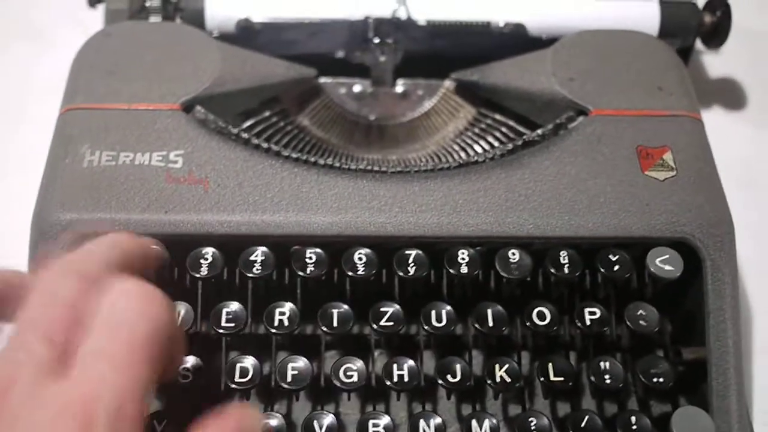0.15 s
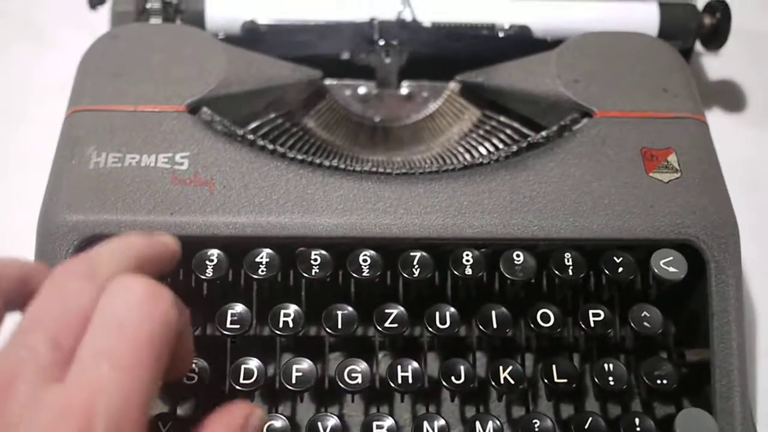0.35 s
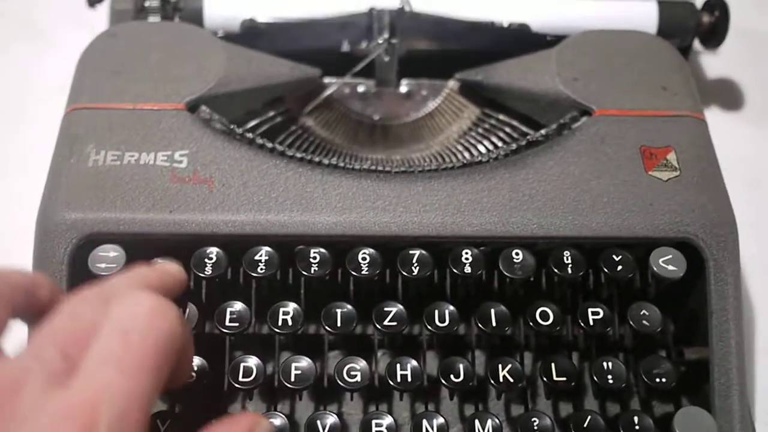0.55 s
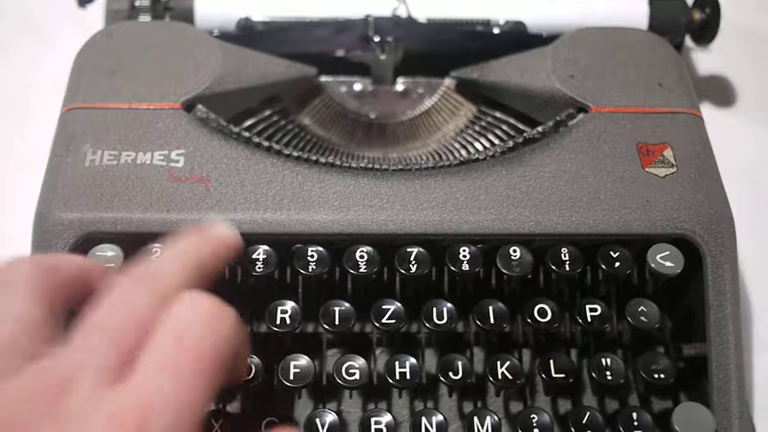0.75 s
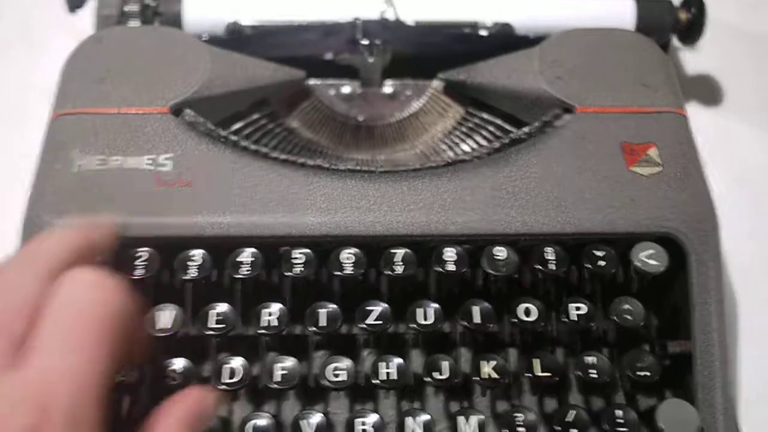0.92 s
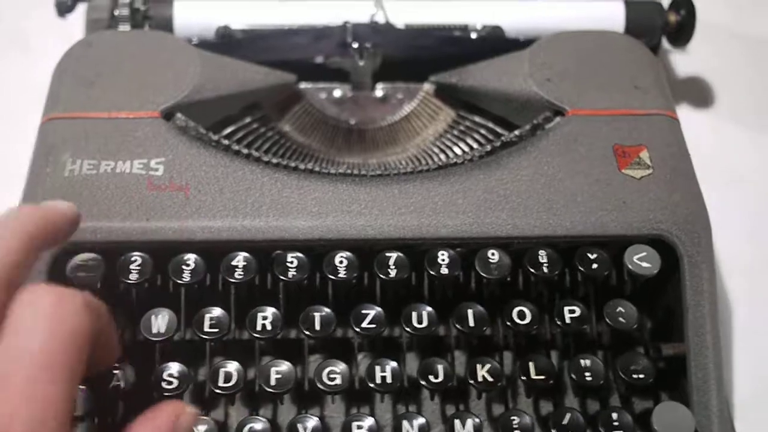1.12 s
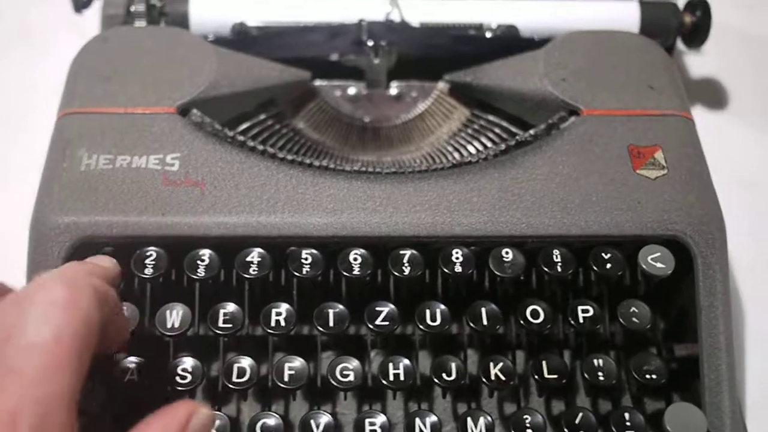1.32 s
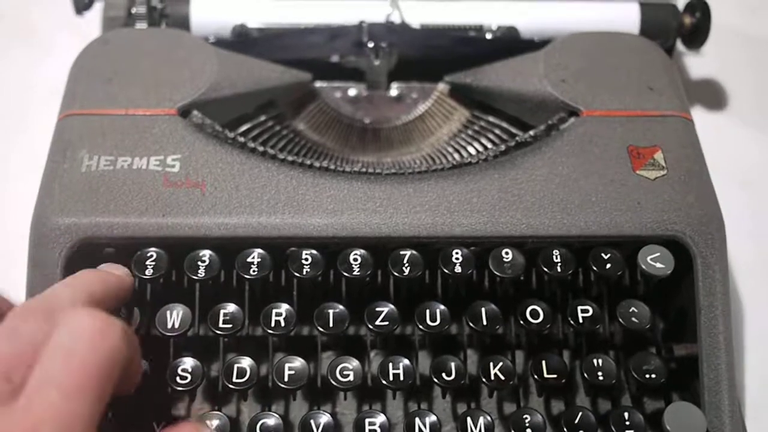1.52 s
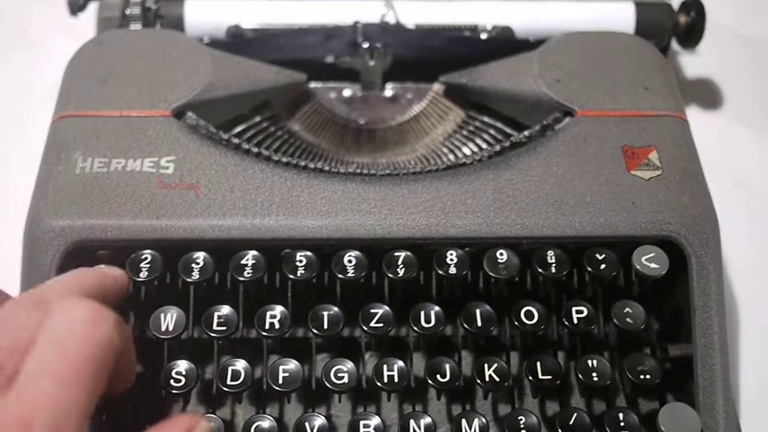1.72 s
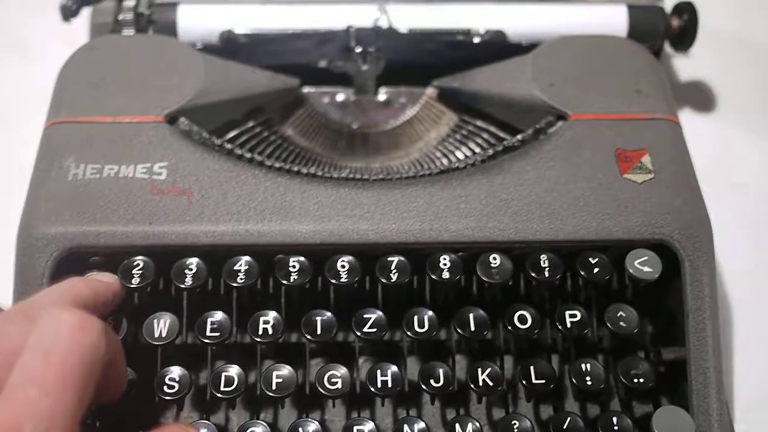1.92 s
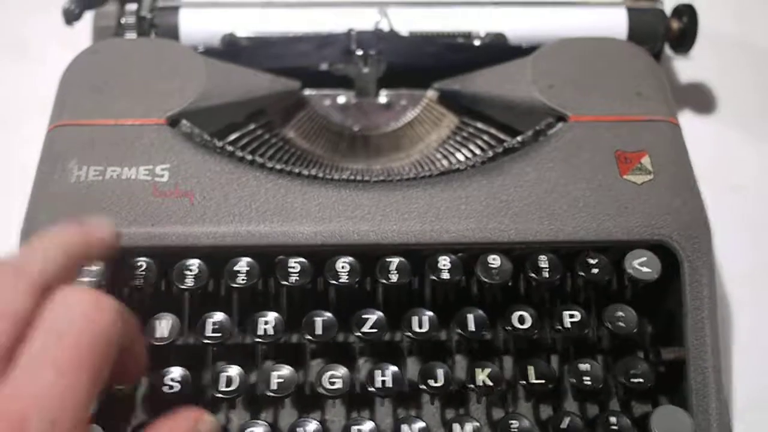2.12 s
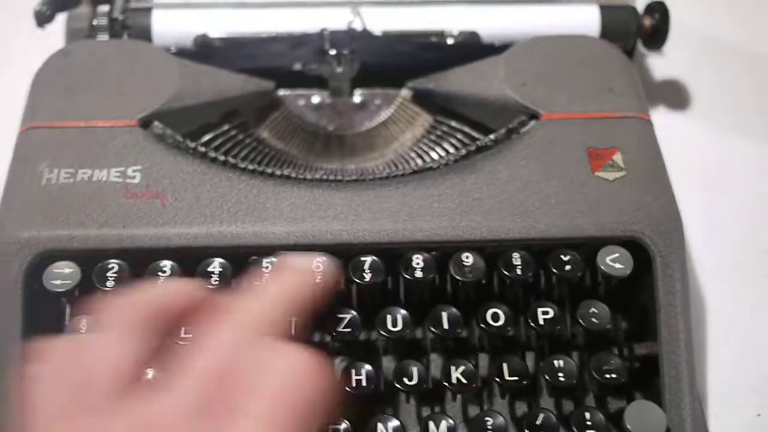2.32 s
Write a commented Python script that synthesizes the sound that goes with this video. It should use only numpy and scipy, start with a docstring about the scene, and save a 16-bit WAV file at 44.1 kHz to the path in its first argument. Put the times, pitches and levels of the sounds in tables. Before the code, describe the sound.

A manual typewriter: two sharp key strikes, then repeated metallic clacks of its shift mechanism indoors

```python
"""Quiet room: a finger types two characters on a small manual typewriter, then works the shift key.
Each contact of metal parts is a short noise chatter that rings the part it hits; springs and levers
rattle as dense random ticks. The table thumps in low sines, noise tails answer as the room, and
shaped noise is the hush. A narrow-band microphone close by overloads on the hardest strike."""
import sys
import numpy as np
from scipy import signal
from scipy.fft import rfft, irfft
from scipy.io import wavfile

SR = 44100
rng = np.random.default_rng(int(sys.argv[2]) if len(sys.argv) > 2 else 0)


def transcribe(signal):
    """Save signal, clipped to [-1, 1], as a 16-bit WAV file at the path in sys.argv[1]."""
    frames = np.atleast_2d(signal).T
    limited = np.clip(frames, -1, 1)
    pcm = np.round(limited * 32767).astype(np.int16)
    wavfile.write(sys.argv[1], SR, pcm)


N = 103635

# modes of the machine frame: mode_hz, level_db, t60_s
FRAME_MODES = [(976, -11, 0.11), (1131, -6, 0.038), (1488, -1, 0.12), (2490, -11, .04), (3930, -20, .04),
               (5560, -17.5, .04)]
# modes of the carriage stop: mode_hz, level_db, t60_s
STOP_MODES = [(555, -9.5, .06), (957, -1, 0.11), (1060, -3, 0.15), (1395, -12, 0.3), (2360, -26.5, 0.082),
              (2600, -33, 0.19), (3220, -10.5, 0.093), (3380, -10, 0.098), (3580, -11, .09),
              (3780, -3.5, 0.12), (5830, -24, .06), (6800, -5, 0.038)]
# microphone response: freq_hz, gain_db
MIC_RESPONSE = [(60, -57), (250, -24), (450, -13), (620, -5.5), (900, 2.5), (2000, 0.5), (3000, 4),
                (6800, -5), (7500, -15), (8100, -34.5), (8900, -37)]


def amp(db):
    """Decibels to amplitude ratio."""
    return 10 ** (np.asarray(db) / 20)


def unit_rms(x):
    """Scale to an RMS of 1."""
    return x / np.sqrt(np.mean(x ** 2) + 1e-20)


def read(points, hz):
    """Interpolate (Hz, value) points along log frequency."""
    f, value = np.transpose(points)
    return np.interp(np.log(hz + 1), np.log(f + 1), value)


def add(mix, start_s, sound):
    """Add a sound into the mix in place, cut at the end."""
    part = mix[round(start_s * SR):][:len(sound)]
    part += sound[:len(part)]


def colour(x, points):
    """Causal minimum-phase filter from (Hz, dB) points."""
    log_gain = np.log(amp(read(points, abs(np.fft.fftfreq(4096, 1 / SR)))))
    taps = np.fft.ifft(np.exp(np.conj(signal.hilbert(log_gain)))).real[:2048]
    return signal.oaconvolve(x, taps)[:len(x)]


def lowpass(x, hz):
    """Steep linear-phase low-pass."""
    return signal.oaconvolve(x, signal.firwin(511, hz, window=("kaiser", 9), fs=SR), "same")


def hush():
    """Room tone and microphone hiss: steady noise with a shaped spectrum."""
    rms_db = -60
    # noise spectrum: freq_hz, relative_density_db
    spectrum = [(15, -42.5), (25, -19.5), (147, -4.5), (209, -6), (284, -6), (423, -13.5), (476, -15),
                (647, -20), (728, -16), (3070, -25), (7000, -33), (9100, -72), (15400, -120)]
    # top-end roll-off of the hiss: freq_hz, gain_db
    mic_roll = [(6900, 6), (7500, -8), (8000, -31.5), (8400, -43)]
    hz = np.fft.rfftfreq(N, 1 / SR)
    gain = amp(read(spectrum, hz) + read(mic_roll, hz))
    return amp(rms_db) * unit_rms(irfft(rfft(rng.standard_normal(N)) * gain, N))


def room(x):
    """Three noise tails, each band dying at its own speed, fed in turn."""
    level_db, build_up_s, turn_rad_per_s = -11, 0.0036, 8.995
    # reverberation time: freq_hz, t60_s
    decay = [(300, 1), (800, 0.76), (2000, 0.71), (5500, 0.53)]
    out, turn = np.zeros(N), np.arange(N) / SR * turn_rad_per_s
    for k in range(3):
        hz, t, z = signal.stft(rng.standard_normal(SR), SR, nperseg=256)
        dying = z * amp(-60 * t / read(decay, hz)[:, None])
        tail = signal.istft(dying, SR, nperseg=256)[1]
        tail = tail * np.minimum(np.arange(len(tail)) / SR / build_up_s, 1) ** 2
        share = np.sqrt(2 / 3) * np.cos(turn + k * np.pi / 3)  # squares sum to 1
        out += signal.fftconvolve(x * share, tail / np.linalg.norm(tail))[:N]
    return amp(level_db) * out


def thumps():
    """Low, soft resonances of the table, swelling and dying together."""
    rise_s, t60_s = 0.013, 0.43
    # table answering the carriage: start_s, level_db
    events = [(0.331, -46.5), (.585, -45.5), (1.202, -57)]
    # table modes: mode_hz
    table_hz = (88, 106.3, 145.5, 198.6)
    # level of each table mode: level_db
    table_db = (-4.5, -2.5, -12, -5.5)
    out, t = np.zeros(N), np.arange(SR // 2) / SR
    for start_s, level_db in events:
        ring = sum(amp(d) * np.sin(2 * np.pi * (hz * t + rng.random()))
                   for hz, d in zip(table_hz, table_db))
        add(out, start_s, amp(level_db - 60 * t / t60_s) * np.minimum(t / rise_s, 1) * ring)
    return out


def spring_rattles():
    """Springs and levers chattering in travel: dense uneven ticks that swell and fade."""
    ticks_per_s, mean_boost_db, n = 2300, 2.5, SR // 5
    # spring and lever travel: start_s, length_s, level_db (before swell and microphone), treble_db
    travels = [(0.222, 0.028, -33, -1), (0.264, 0.16, -38, -11), (.475, 0.045, -37, -10.5),
               (.515, 0.16, -35.5, -2), (1.028, 0.17, -63.5, -24), (1.202, 0.054, -34.5, -8),
               (1.359, 0.019, -40, -7), (1.393, 0.21, -45, -4.5), (1.486, 0.032, -37, -1),
               (1.579, 0.01, -37.5, -7.5), (1.691, 0.029, -41.5, 3.5), (1.787, 0.044, -42, -5.5),
               (1.794, 0.02, -37.5, -4), (1.885, 0.09, -43.5, -8), (1.908, 0.009, -35, 9),
               (2.069, 0.0051, -34.5, -4), (2.046, 0.024, -42.5, -4)]
    out = np.zeros(N)
    for start_s, length_s, level_db, treble_db in travels:
        heights = amp(mean_boost_db * rng.exponential(1, n))
        ticks = heights * (rng.random(n) < ticks_per_s / SR)
        ticks = ticks * rng.choice([-1., 1.], n)
        tone = [(1300, 7), (2200, -2), (3200, 0), (5200, treble_db)]
        ticks = unit_rms(colour(ticks, tone))
        progress = np.clip(np.arange(n) / SR / length_s, 0, 1)
        add(out, start_s, amp(level_db) * ticks * np.sin(np.pi * progress) ** .5)
    return colour(out, MIC_RESPONSE)


def mode_cluster(t, mode_hz, level_db, t60_s):
    """Six close decaying sines; long-ringing groups lie closer together."""
    half_width = .035 * min(1, .2 / t60_s)  # relative to mode_hz
    ring = 0
    for offset, phase_cycles in rng.random(size=(6, 2)):
        hz = mode_hz * (1 + half_width * (2 * offset - 1))
        ring = ring + np.sin(2 * np.pi * (hz * t + phase_cycles))
    return amp(level_db - 60 * t / t60_s) * ring


def contacts(rows, modes, ring_db, rise, fade_db, stop_db):
    """Each contact: a dying chatter of tiny impacts, heard as a crack and through groups of close modes.

    Row 0 goes straight to the microphone; row 1, the blow averaged over all directions, fills the room.
    rise is in chatter lengths, fade_db per chatter length; stop_db adds to that slope after one length.
    """
    roughness, clank_width, room_clank = 0.1, 0.18, 0.39  # spikiness, relative width, share of clank dB
    out, t = np.zeros((2, N)), np.arange(SR // 3) / SR
    for start_s, peak_db, chatter_s, low_db, treble_db, clank_hz, clank_db in rows:
        chatter = rng.standard_normal(1500)
        u = np.arange(len(chatter)) / SR / max(chatter_s, 1e-4)
        envelope = np.minimum(u / max(rise, .01), 1) * amp(fade_db * u + stop_db * np.maximum(u - 1, 0))
        chatter = chatter * abs(chatter) ** roughness * envelope
        body = sum(mode_cluster(t, *mode) for mode in modes) * amp(ring_db)
        body[0] = 1  # the direct crack
        tone = [(1300, low_db), (2100, 0), (3900, 0.02), (5200, treble_db)]
        body = colour(colour(body, tone), MIC_RESPONSE)
        clank = [(clank_hz * (1 - clank_width), 0), (clank_hz, clank_db), (clank_hz * (1 + clank_width), 0)]
        sound = colour(signal.fftconvolve(chatter, body), clank)
        sound = amp(peak_db) * sound / abs(sound).max()
        spread = colour(body, [(hz, room_clank * d) for hz, d in clank])
        spread = spread * np.linalg.norm(sound) / np.linalg.norm(spread)  # same energy
        add(out[0], start_s, sound)
        add(out[1], start_s + chatter_s / 2, spread)
    return out


def shift_ticks():
    """Light ticks of the shift ringing the carriage stop."""
    # start_s, peak_db, chatter_s, low_db, treble_db, clank_hz, clank_db
    ticks = [(1.466, -26.5, 0.0045, -17, 8, 3300, 2.65), (1.670, -31, 0.0084, 0, 6, 3340, 5),
             (1.764, -38, 0.009, 7, 4.5, 3100, 2), (1.880, -26.5, 0.0027, 5.5, 8, 3330, 6.6),
             (2.048, -45, 0.0022, 1, 14, 1210, 1.7)]
    return contacts(ticks, STOP_MODES, ring_db=-43.5, rise=0.07, fade_db=-6.5, stop_db=1.5)


def shift_drops():
    """Shift drops ringing the carriage stop."""
    # start_s, peak_db, chatter_s, low_db, treble_db, clank_hz, clank_db
    drops = [(1.214, -13, 0.0034, 1.5, 3, 3280, 15.3), (1.498, -20.5, 0.0023, -0.5, -14, 4600, 1.7),
             (1.5005, -16.5, 0.0044, 0, 2.5, 3000, 6.7), (1.922, -13.5, 0.0044, -1, -1.5, 3230, 10.5)]
    return contacts(drops, STOP_MODES, ring_db=-46.5, rise=.45, fade_db=-9, stop_db=2.5)


def shift_clunks():
    """Shift clunks ringing the carriage."""
    # start_s, peak_db, chatter_s, low_db, treble_db, clank_hz, clank_db
    clunks = [(1.186, -26, 0.01, 4, 5, 2930, 3), (1.191, -18, 0.0074, 4.5, 3, 2600, 4),
              (1.376, -17.5, 0.0065, 3, 3.5, 3450, 2), (1.381, -19, 0.0091, 3, -4, 2680, 7),
              (1.593, -27, 0.0058, -4.5, 5.5, 5560, 2), (1.597, -20, 0.0051, 3.5, -5, 1980, 2),
              (1.602, -16.5, 0.0072, 1, -1.5, 2580, 7), (1.805, -16.5, 0.0075, 2, 1.5, 3070, 2),
              (1.811, -18, 0.01, 0.5, -4.5, 2560, 6), (2.073, -19.5, 0.012, 0, 0, 3160, 2),
              (2.079, -15.5, 0.0084, 5.5, -3.5, 2580, 7)]
    # carriage modes: mode_hz, level_db, t60_s
    carriage_modes = [(597.3, -7, 0.28), (830, -19.5, 0.041), (925, -14.5, 0.29), (1076, -3.5, 0.15),
                      (1404, -29.5, 0.24), (1563, -2.5, .11), (1858, -7, 0.21), (2422, -2, 0.091),
                      (2680, -4.5, 0.028), (3160, -12.5, 0.08), (3360, -13, 0.093), (3730, -6, 0.11),
                      (5695, -5.5, 0.18)]
    return contacts(clunks, carriage_modes, ring_db=-48, rise=0.17, fade_db=-7, stop_db=-3)


def linkage_clicks():
    """Key linkage clicking around each strike, ringing the frame."""
    # start_s, peak_db, chatter_s, low_db, treble_db, clank_hz, clank_db
    clicks = [(.189, -30.5, 0.0095, 5.5, 3, 2560, 4.6), (.219, -31.5, 0.0029, 14, -7, 3700, 8.7),
              (.229, -22, 0.0036, -5, -7.5, 1960, 2), (.2365, -17.5, 0.012, 1, 4.5, 5560, 2),
              (.253, -20, 0.0036, -1, -8.5, 3980, 3), (.271, -43.5, 0.002, 27, 7.5, 5050, 2.5),
              (.475, -36, 0.0027, 18.5, 9.5, 3500, 4), (.483, -21, 0.002, 13.5, -2, 2000, 2),
              (.491, -15.5, 0.011, -10.5, 0.5, 4900, 4), (.505, -27.5, 0.0018, 15.5, -11, 3500, 1.8),
              (.517, -43.5, 0.0018, -11, -12.5, 3500, 3.8)]
    return contacts(clicks, FRAME_MODES, ring_db=-42, rise=0.05, fade_db=-5.5, stop_db=-0.5)


def escapement_steps():
    """Escapement stepping after each character, ringing the frame."""
    # start_s, peak_db, chatter_s, low_db, treble_db, clank_hz, clank_db
    steps = [(.3282, -19, 0.0044, 5, 0.03, 4270, 4), (.5808, -18.5, 0.0025, 4, -0.54, 3420, 3)]
    return contacts(steps, FRAME_MODES, ring_db=-38, rise=.1, fade_db=-5, stop_db=-6)


def bar_returns():
    """Type bars returning and ringing their rest."""
    # start_s, peak_db, chatter_s, low_db, treble_db, clank_hz, clank_db
    returns = [(.3556, -10.5, 0.0058, 0.5, -2, 2614, 6.1), (.6090, -11, 0.0055, -1.5, -2, 2674, 12.4)]
    # bar rest modes: mode_hz, level_db, t60_s
    rest_modes = [(889, -22.5, 0.2), (1020, -4.5, 0.17), (1296, -6, 0.33), (1476, -13, 0.3),
                  (1840, -13.5, 0.16), (2650, -14, .3), (2730, -5.5, 0.056), (4664, 10, 0.023),
                  (5200, 5.5, 0.052), (6040, -16, .06)]
    return contacts(returns, rest_modes, ring_db=-47, rise=0.091, fade_db=-1.5, stop_db=-29.5)


def slug_strikes():
    """Type slugs striking: very short cracks with a faint frame ring."""
    # start_s, peak_db, chatter_s, low_db, treble_db, clank_hz, clank_db
    strikes = [(.2444, -2.5, 0.0011, -10, 8, 3000, 0.5), (.4963, -0.2, .001, -5.5, 9, 2946, 5)]
    return contacts(strikes, FRAME_MODES, ring_db=-60, rise=.2, fade_db=-4, stop_db=-30)


def scene():
    """Machine direct and through the room, over table thumps and hush."""
    machine = slug_strikes() + linkage_clicks() + escapement_steps() + bar_returns()
    machine = machine + shift_clunks() + shift_drops() + shift_ticks()
    direct, to_room = machine + spring_rattles()  # rattles feed both
    return (direct + room(to_room) + thumps() + hush())[None]


def record(dry):
    """Narrow capsule band, hard overload, band limit."""
    capsule_hz, overload, band_hz = 9100, .74, 16600
    capsule = lowpass(dry[0], capsule_hz)
    return lowpass(np.clip(capsule, -overload, overload), band_hz)[None]


dry = scene()
out = record(dry)
transcribe(out)
```